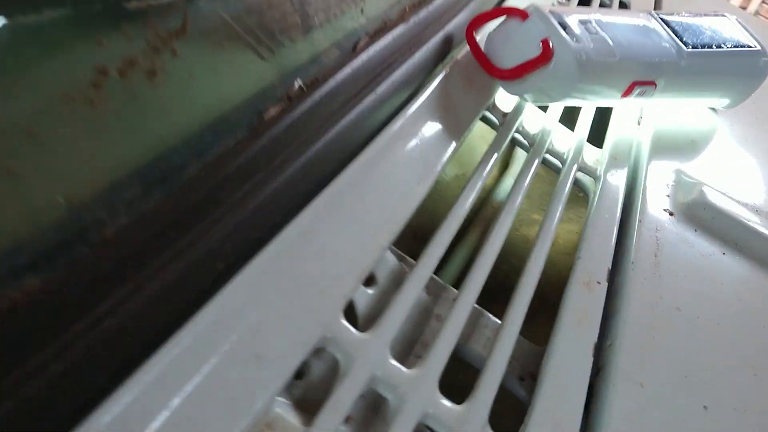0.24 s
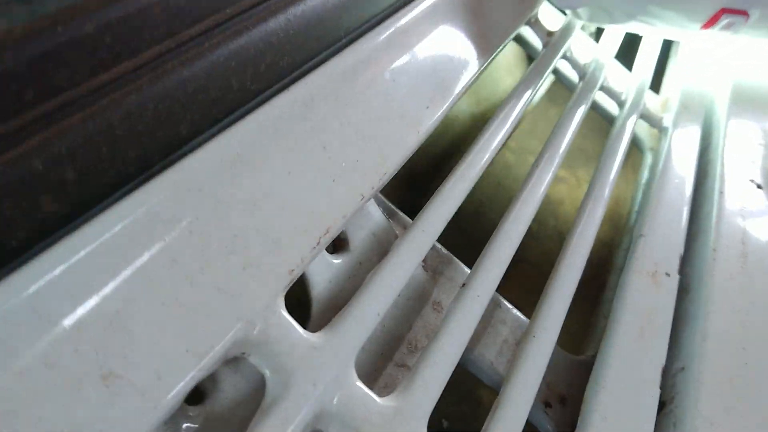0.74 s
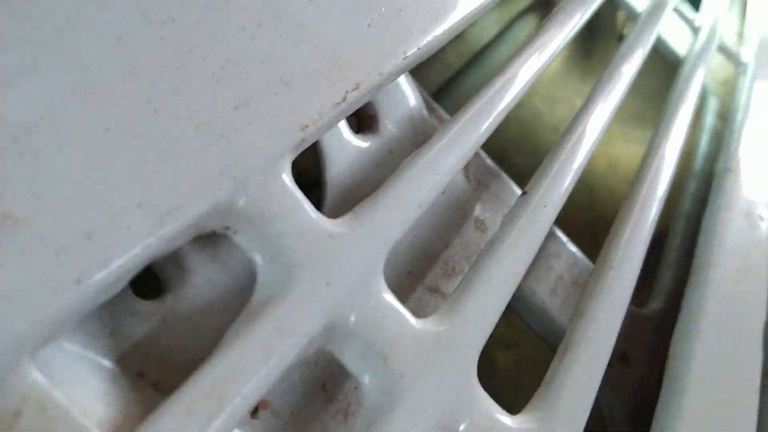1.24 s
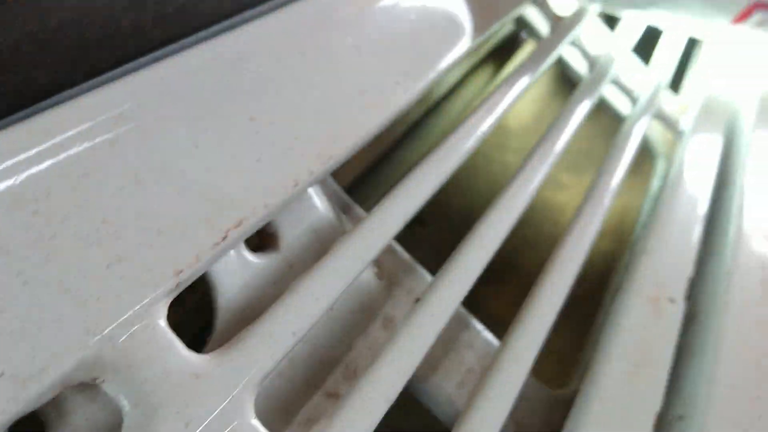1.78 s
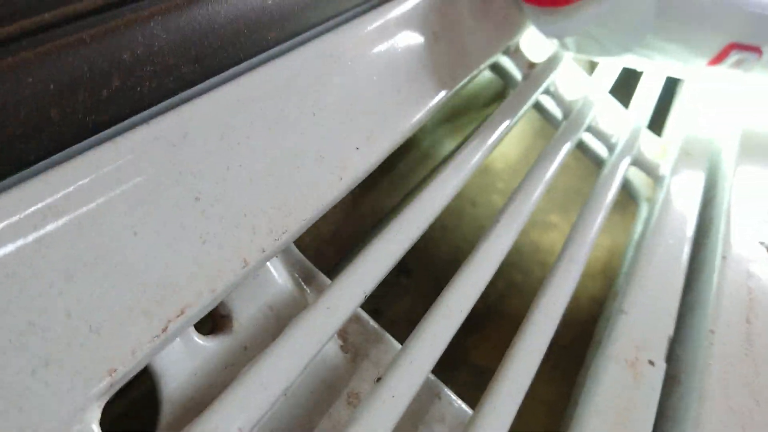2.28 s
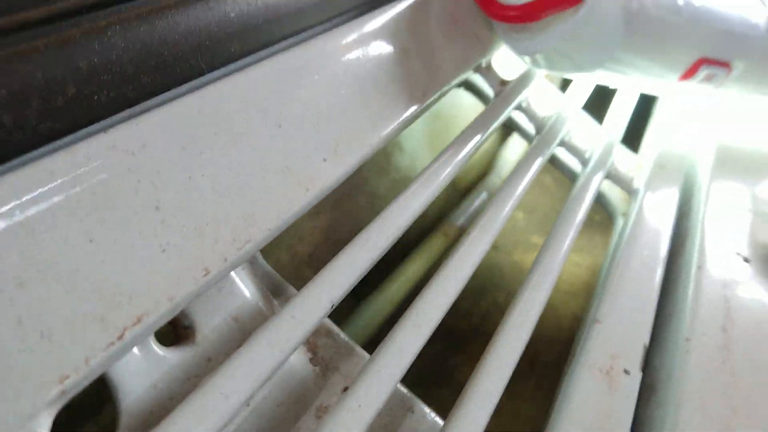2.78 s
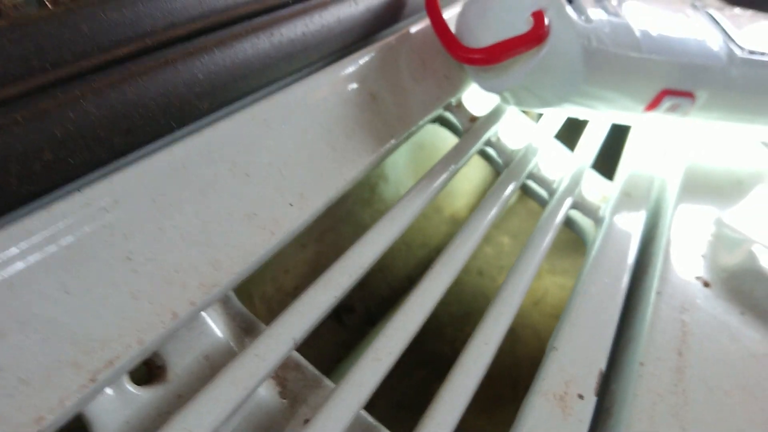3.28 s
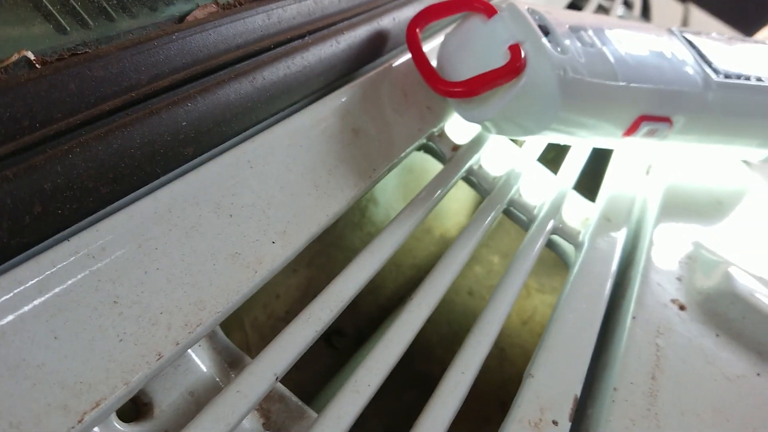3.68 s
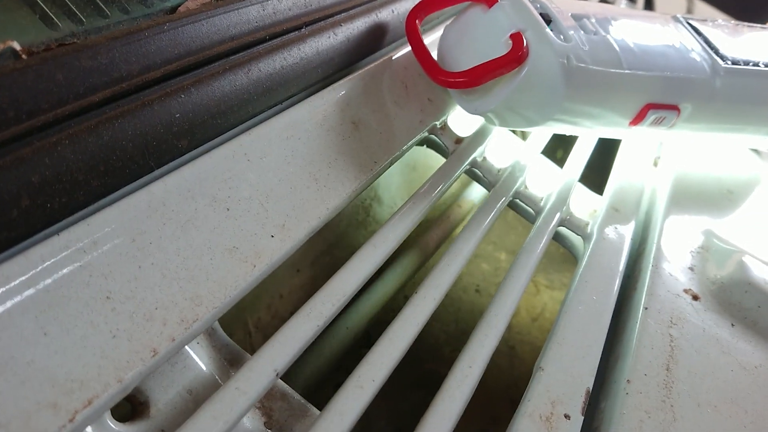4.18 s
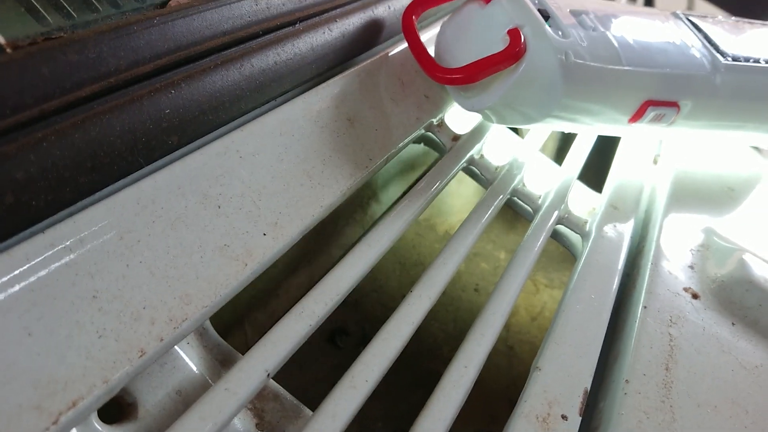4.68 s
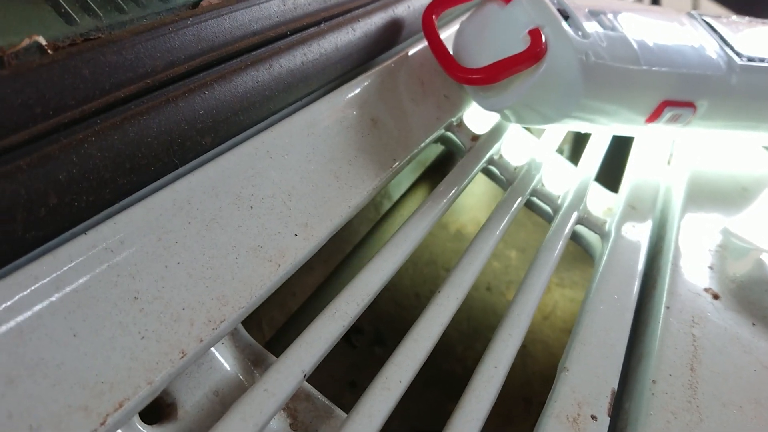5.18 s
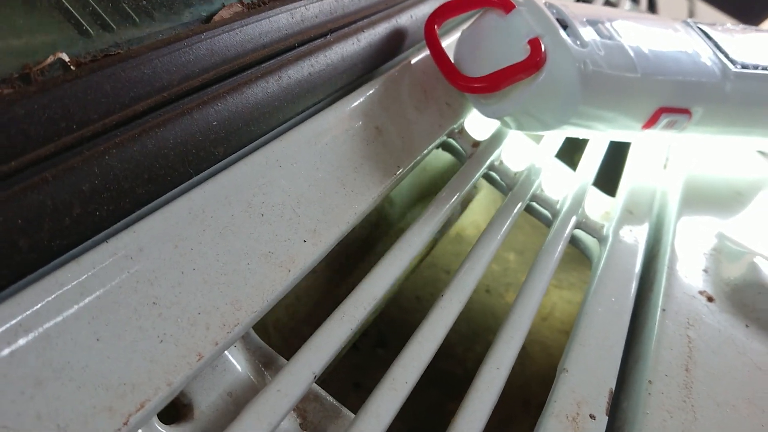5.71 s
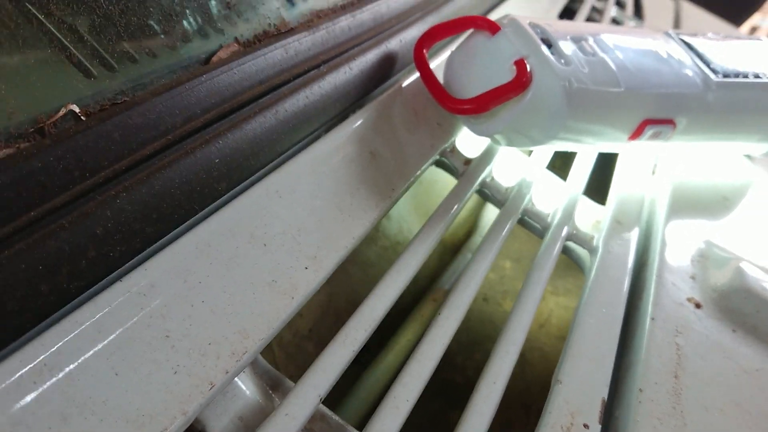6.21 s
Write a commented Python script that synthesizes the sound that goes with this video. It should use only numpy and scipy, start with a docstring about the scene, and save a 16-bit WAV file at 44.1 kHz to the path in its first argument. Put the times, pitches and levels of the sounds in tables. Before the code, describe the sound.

Piercing, near-pure squeals chirp and hold at two high pitches as a wiper linkage works under a truck cowl, with soft knocks and brief groans over motor hum.

```python
"""First comes a short squeak over a motor's hum: a wiper linkage works to and fro under the cowl of a parked truck.
It is heard from close by, louder on the left, over a background hiss. Dry contacts lock into two near-pure squeals,
about 5 and 8 kHz (sines with overtones). Slack joints knock (ringing cowl modes, rattle and thump); thin whistles
and low moans (gliding sines) and bursts of band noise sound; at the turn a pivot groans (a rough row of harmonics).
The shed rings after the sounds (dying noise), and the gain ducks under loud squeals."""
import sys
import numpy as np
from scipy import signal
from scipy.fft import rfft, irfft
from scipy.io import wavfile
from scipy.ndimage import uniform_filter1d

SR = 44100
rng = np.random.default_rng(int(sys.argv[2]) if len(sys.argv) > 2 else 0)


def output_pcm(signal):
    """Save a mono or channel-first signal as 16-bit PCM at the path in sys.argv[1].

    Samples are clipped to [-1, 1] before scaling.
    """
    pcm = np.clip(np.atleast_2d(signal).T, -1, 1) * 32767
    wavfile.write(sys.argv[1], SR, np.round(pcm).astype(np.int16))


N = 284445      # samples in the scene

# The background, with dips under loud squeals: (time [s], motor rumble level [dB], background hiss level [dB])
BACKGROUND = [(0, -51.5, -59.5), (.79, -50.5, -53), (.95, -54.5, -64.5), (1.3, -47.5, -59.5),
              (1.85, -49.5, -50.5), (2.3, -50, -49), (2.65, -47.5, -52.5), (3.36, -52, -59),
              (4.1, -50, -53.5), (4.38, -50.5, -60), (5.6, -50, -48.5), (5.815, -48, -54),
              (5.89, -57, -71.5), (6.04, -49.5, -67), (6.09, -53, -57.5), (6.2, -56.5, -59),
              (6.45, -50.5, -56)]
# Colour of the motor's rumble: (frequency [Hz], relative level [dB])
RUMBLE_COLOUR = [(25, -25.5), (50, 0.5), (79, -3), (108, 1), (156, -13.5), (204, -5), (243, -13.5),
                 (401, -14), (535, -12.5), (601, -15.5), (757, -20.5), (1130, -27.5), (2500, -32),
                 (3250, -72)]
# Colour of the background hiss: (frequency [Hz], relative level [dB])
HISS_COLOUR = [(880, -50), (1500, -15), (2330, -9.5), (2860, -2.5), (5580, -1), (9940, -1), (11900, -7.5),
               (15600, -1.5)]
# How alike noise is on the left and right: (frequency [Hz], likeness [0 to 1])
LIKENESS = [(60, 1), (300, 0.93), (600, 0.3), (1650, 0.084), (15000, 0.0093)]
# How far noise leans to the left: (frequency [Hz], left over right [dB])
NOISE_LEAN = [(60, 2.5), (250, 11.5), (550, 14.5), (1650, 6.5), (4970, 10), (15000, 4.5)]

# Short lower squeaks: (start [s], rise [s], hold [s], fall [s], pitch [Hz], glide [Hz],
#                       level [dB], octave level [dB], left over right [dB])
LOW_CHIRPS = [(0, 0.00073, 0.008, 0.22, 5490, -21, -22, -24.5, 34.5),
              (.034, 0.0084, 0.024, 0.04, 5464, -34.5, -23, -29.5, 16),
              (.87, 0.015, .004, 0.0075, 4880, 22.5, -32.5, -78, 16.5),
              (2.468, 0.026, 0.0024, 0.0036, 4960, -25.5, -21.5, -27.5, 10),
              (2.486, 0.0039, 0.0018, 0.0077, 5005, 61.5, -14, -37.5, 17),
              (3.103, 0.023, 0.012, 0.015, 5600, 38.5, -26.5, -76, 40),
              (3.708, 0.019, 0.0068, 0.0099, 5435, 9.5, -29.5, -39, 14),
              (3.743, 0.017, 0.0033, 0.02, 5380, -8, -17.5, -31, 16.5),
              (3.783, 0.011, 0.017, 0.049, 5430, -21, -19.5, -27.5, 12.5),
              (4.27, 0.036, 0.0087, 0.035, 4880, -13, -33.5, -72.5, 14.5)]
# Held lower squeals, one list each: (time [s], pitch [Hz], level [dB], octave level [dB], left over right [dB])
LOW_HELD = [
    [(0.325, 5420, -55, -81, 19), (0.349, 5464, -24.5, -58, 26.5), (0.377, 5380, -21.5, -31.5, 24),
     (0.457, 5370, -26, -23.5, 10), (0.555, 5383, -16.5, -31, 23), (0.627, 5416, -10, -37, 34.5),
     (0.649, 5404, -14, -40, 33.5), (0.666, 5400, -37, -51, 34)],
    [(2.197, 5010, -59.5, -69, 3), (2.215, 5040, -31.5, -39.5, 8.5), (2.241, 4970, -22, -30, 10),
     (2.267, 4966, -21, -21.5, 12.5), (2.281, 5010, -37, -41, 1), (2.292, 5045, -32, -39, 11),
     (2.308, 5033, -22, -39.5, 7), (2.318, 4750, -31, -41, 4), (2.343, 4790, -36, -73, -2),
     (2.356, 4815, -55.5, -80, 3)],
    [(3.153, 5680, -30, -75, 44), (3.161, 5560, -12, -47.5, 36), (3.169, 5507, -11.5, -21.5, 39),
     (3.215, 5575, -10.5, -39, 46.5), (3.247, 5514, -16, -24, 26), (3.265, 5578, -11, -35, 32.5),
     (3.301, 5524, -13, -26.5, 33), (3.327, 5473, -19, -39.5, 30), (3.363, 5490, -16, -28, 34),
     (3.403, 5600, -24.5, -44, 33), (3.419, 5442, -16, -30, 30), (3.46, 5500, -38.5, -56, 17.5)],
    [(3.855, 5430, -51, -27, 1), (3.901, 5400, -19.5, -19.5, 10.5), (3.915, 5410, -21.5, -22.5, 14.5),
     (3.985, 5426, -10.5, -19, 19.5), (4.009, 5428, -9.5, -25.5, 27), (4.017, 5482, -13, -32, 17),
     (4.027, 5340, -40.5, -56.5, 16.5)],
    [(5.599, 4900, -73, -73, 12.5), (5.613, 5030, -25.5, -33, 10.5), (5.626, 5063, -39, -38.5, 2),
     (5.644, 4990, -25.5, -25.5, 8), (5.658, 5063, -34.5, -45, 1.5), (5.676, 4974, -25, -31, 13),
     (5.724, 5020, -42.5, -75, 0), (5.734, 4720, -39, -51.5, 0.5), (5.757, 4790, -27.5, -46, 6.5),
     (5.78, 4940, -47, -70.5, 11.5)],
]
# Short upper squeaks: (start [s], rise [s], hold [s], fall [s], pitch [Hz], glide [Hz],
#                       level [dB], left over right [dB])
HIGH_CHIRPS = [(1.131, 0.0098, 0.0018, 0.015, 8160, 121.5, -14, 20.5),
               (1.162, 0.0085, 0.027, 0.011, 8680, -250, -12, 20),
               (1.198, 0.0024, 0.014, 0.017, 8440, -200, -16, 19),
               (1.233, 0.015, 0.002, 0.03, 8630, -120, -14, 22),
               (2.438, 0.0076, 0.0026, 0.012, 7965, -250, -12, 19),
               (2.5, 0.017, 0.0029, 0.012, 8190, -150, -9.5, 17.5),
               (2.527, 0.0031, 0.003, 0.0086, 7880, -100, -13.5, 12.5),
               (2.617, 0.0057, 0.022, 0.042, 8570, -91, -12, 11.5),
               (2.695, 0.0067, 0.012, 0.018, 8193, 25, -20, 19),
               (2.796, 0.0064, 0.0025, 0.0087, 8350, 48.5, -34, 22),
               (4.396, 0.0039, 0.0088, 0.014, 8240, -150, -22.5, 6),
               (4.527, 0.0081, 0.0018, 0.015, 8200, 204.5, -16, 7.5),
               (4.552, 0.013, 0.071, 0.0064, 8725, -41, -16, 18.5),
               (4.586, 0.0089, 0.0087, 0.057, 8645, -40, -15.5, 24.5),
               (5.6, 0.015, 0.011, 0.024, 8275, 73.5, -30, 12),
               (5.806, 0.0081, 0.00084, 0.0024, 8070, -64, -11, 13.5),
               (5.818, 0.0025, 0.0084, 0.0031, 8096, -62, -11.5, 14),
               (5.832, 0.0016, 0.0035, 0.022, 7936, -54, -9, 30.5),
               (5.866, 0.018, 0.0016, 0.0069, 7980, 50, -6.5, 20),
               (5.896, 0.0024, 0.012, 0.0037, 8235, -49, -18, 17.5),
               (5.911, 0.0028, 0.0023, 0.0096, 7826, -150, -12.5, 14),
               (6.004, 0.0084, 0.024, 0.045, 8560, -150, -12, 20),
               (6.098, 0.0049, 0.0067, 0.01, 8044, 21.5, -21, 26),
               (6.168, 0.008, 0.004, 0.025, 8240, -22, -28.5, 23)]
# Held upper squeals, one list each: (time [s], pitch [Hz], level [dB], left over right [dB])
HIGH_HELD = [
    [(.662, 8420, -59, 12.5), (.685, 8440, -19.5, 12), (.715, 8470, -12.5, 10.5), (.736, 8380, -18, 16.5),
     (.747, 8430, -4.5, 17.5), (.767, 8560, -9.5, 39.5), (.8, 8520, -6.5, 20), (.834, 8470, -9, 12),
     (.886, 8500, -8.5, 25), (.909, 8260, -19.5, 7), (.945, 8335, -11.5, 9), (.992, 8330, -9.5, -0.5),
     (1.009, 8350, -17.5, 6), (1.021, 7770, -40, -5.5)],
    [(4.03, 8480, -39, 29), (4.041, 8480, -11.5, 27.5), (4.055, 8470, -7.5, 26.5), (4.062, 8550, -12, 20.5),
     (4.068, 8560, -7.5, 14), (4.111, 8560, -6.5, 12.5), (4.242, 8530, -12.5, -2.5), (4.31, 8490, -12, 11),
     (4.331, 8480, -19.5, 1), (4.344, 8410, -13.5, 6.5), (4.38, 8590, -16.5, 13), (4.393, 8190, -15.5, 14)],
]
# How faint a short squeak begins and ends, against its held level [dB]
LOW_START_DB, LOW_END_DB = -22, -10.5
HIGH_START_DB, HIGH_END_DB = -14, -12.5

# The shed's ringing: first return, time to die by 60 dB, loudness, and where its treble dulls
SHED_ONSET_S = 0.0075
TREBLE_T60_S, TREBLE_SHED_DB, TREBLE_DULL_HZ = 0.43, -23, 6430
BASS_T60_S, BASS_SHED_DB, BASS_DULL_HZ = 0.53, -20.5, 870

# Knocks of slack joints: (time [s], blow level [dB], thump level [dB], pitch favoured by the struck spot [Hz])
KNOCKS = [(0.433, -38, -63.5, 434), (1.081, -34, -54.5, 402), (1.134, -32, -33, 350),
          (2.256, -40.5, -40, 255.7), (2.295, -42, -44.5, 255), (2.432, -40.5, -43, 533),
          (2.645, -38.5, -35, 547), (2.688, -40.5, -44, 618), (3.817, -36, -59, 430),
          (4.475, -34, -58, 380), (4.528, -33, -30.5, 381), (5.818, -41, -40.5, 404),
          (6.045, -40, -42, 516), (6.094, -43.5, -50, 448)]
# Ringing modes of the cowl: (frequency [Hz], time to die by 60 dB [s])
COWL_MODES = [(255, .14), (352, .15), (422, .1), (535, .16), (800, .1), (1180, .06)]
SPOT_DB_PER_OCTAVE = 15      # modes far from the favoured pitch are struck more weakly
THUMP_BAND_HZ, THUMP_T60_S = (75.4, 170), 0.18

# Short extra tones, thin whistles beside the squeals and low moans beside the groans:
# (start [s], end [s], pitch [Hz], size of pitch arch [Hz], level [dB])
SHORT_TONES = [(.995, 1.028, 4150, -60, -52), (1.12, 1.165, 8480, 100, -26), (1.178, 1.21, 4430, -60, -48),
               (1.25, 1.305, 405, -30, -44), (1.305, 1.37, 505, 20, -36), (2.31, 2.365, 5000, -40, -37),
               (2.308, 2.36, 4530, -40, -46), (2.525, 2.56, 8220, -50, -21), (3.752, 3.89, 2850, 120, -50),
               (3.76, 3.86, 8300, 150, -56), (4.378, 4.43, 4120, -60, -53), (4.515, 4.555, 8480, 150, -28),
               (4.565, 4.605, 4500, -150, -51), (4.638, 4.7, 425, 20, -42), (4.7, 4.765, 510, 20, -39),
               (5.33, 5.47, 2850, 110, -52), (5.72, 5.795, 5010, 0, -39), (5.725, 5.775, 4540, 30, -45)]
# Bursts of band noise, being scrapes, ticks, groan roughness and a low rumble:
# (start [s], end [s], middle of the band [Hz], level [dB])
NOISE_BURSTS = [(1.4, 1.9, 4200, -56.5), (2.42, 2.58, 4500, -49.5), (4.46, 4.68, 4200, -55),
                (1.03, 1.2, 670, -52), (1.12, 1.17, 2330, -59), (1.3, 1.35, 1660, -53),
                (4.695, 4.735, 1600, -49.5), (4.43, 4.6, 700, -54.5), (4.5, 4.8, 111, -49),
                (3.158, 3.178, 1880, -55.5), (3.158, 3.176, 3800, -49.5), (2.505, 2.522, 1210, -59.5)]

# Pivot groans at the turn: (start [s], rise [s], hold [s], fall [s], pitch [Hz], glide [Hz],
#                            level [dB], octave level [dB])
GROANS = [(1.197, 0.017, 0.027, 0.012, 869, -45.5, -46, -66),
          (1.247, 0.019, 0.0069, 0.07, 755, 31.5, -29.5, -42),
          (4.59, 0.015, 0.02, 0.0032, 792, -30.5, -40, -45),
          (4.627, 0.0035, 0.054, 0.04, 759.7, -35, -32, -43)]
# Third to fifth multiples of the groan's pitch: (level over the octave [dB])
GROAN_UPPER_DB = (-11.5, -22.5, -19)
GROAN_START_DB, GROAN_END_DB = -12.5, (-9, -6.5)      # the end pair is for (tone, octave)

CUTOFF_HZ = 15850      # top of the recorded treble


def from_db(db):
    """Turn decibels into a plain multiplier."""
    return 10 ** (np.asarray(db) / 20)


def rms_one(x):
    """Scale a signal to an rms of 1."""
    return x / np.sqrt(np.mean(x ** 2) + 1e-20)


def in_time(rows):
    """Columns of a table that starts with time, drawn as lines sample by sample."""
    s, *columns = np.transpose(rows)
    return [np.interp(np.arange(N) / SR, s, column) for column in columns]


def at_hz(points, hz):
    """Read a curve over frequency, on a logarithmic pitch scale."""
    known_hz, values = np.array(points).T
    return np.interp(np.log(hz), np.log(known_hz), values)


def drift(rate):
    """Slow chance: noise low-passed twice at the rate in Hz, with an rms of 1."""
    r = np.exp(-2 * np.pi * rate / SR)
    noise = rng.standard_normal(N + SR)
    settled = signal.lfilter([1], [1, -2 * r, r * r], noise)[SR:]
    return rms_one(settled)


def gate(spans):
    """1 inside the spans, 0 outside, with rounded edges of a few ms."""
    on = np.zeros(N)
    for start, end in spans:
        on[max(round(start * SR), 0):round(end * SR)] = 1
    return uniform_filter1d(uniform_filter1d(on, size=100), size=100)


def coloured(spectrum):
    """Stereo noise of a given colour, likeness and lean; the mean of both sides has an rms of 1."""
    hz = np.maximum(np.fft.rfftfreq(N, 1 / SR), 5)
    shape = from_db(at_hz(spectrum, hz))
    mid, side = rfft(rng.standard_normal((2, N)))
    alike = np.clip(at_hz(LIKENESS, hz), 0, 1)
    lean = from_db(at_hz(NOISE_LEAN, hz) / 2)      # half is given to each side
    mid, side = np.sqrt(1 + alike) * mid, np.sqrt(1 - alike) * side
    out = irfft(shape * np.array([(mid + side) * lean, (mid - side) / lean]), N)
    return out / np.sqrt(np.mean(out.mean(0) ** 2))


def motor_hum():
    """The motor's low rumble: coloured noise whose level rises, dips and flickers."""
    level_db, _ = in_time(BACKGROUND)
    return from_db(level_db + 1.6 * drift(10)) * coloured(RUMBLE_COLOUR)


def background_hiss():
    """Bright coloured noise whose level rises and falls, dips under loud squeals and flickers."""
    _, level_db = in_time(BACKGROUND)
    return from_db(level_db + 0.7 * drift(15)) * coloured(HISS_COLOUR)


def chirps(rows, start_db, end_db, count):
    """Each slip swells, holds and fades while its pitch glides evenly; the next one squeezes it if too near."""
    tables = []
    next_starts = [row[0] for row in rows[1:]] + [N / SR]
    for (start, rise, hold, fall, hz, glide_hz, *rest), next_start in zip(rows, next_starts):
        steps = np.cumsum([0, abs(rise), abs(hold), abs(fall)])
        squeeze = min(1, (next_start - start - 1 / SR) / steps[-1])
        table = []
        for t, db in zip(steps, (start_db, 0, 0, end_db)):
            pitch_hz = hz + glide_hz * (t / steps[-1] - 0.5)
            levels_db = np.add(rest[:count], db)      # the first columns are levels
            table.append((start + squeeze * t, pitch_hz, *levels_db, *rest[count:]))
        tables.append(table)
    return tables


def bursts(tables, wobble_hz, levels):
    """Phase, gate and other columns of a self-driven tone; its levels swell along rounded curves."""
    rows = np.array(sorted(tuple(row) for table in tables for row in table), float)
    rows[:, 2:2 + levels] = np.sqrt(from_db(rows[:, 2:2 + levels]))
    hz, *rest = [uniform_filter1d(c, size=130) for c in in_time(rows)]      # inertia rounds the corners
    rest[:levels] = 2 * 20 * np.log10(rest[:levels])      # back to dB, undoing the square root
    phase = 2 * np.pi * np.cumsum(hz + wobble_hz * drift(60)) / SR
    on = gate([(table[0][0], table[-1][0]) for table in tables])
    return phase, on, rest


def tone(phase, level_db, lean_db, lag):
    """A sine on both sides, the right one scaled down by the lean and lagging; level is the rms of their mean."""
    right = from_db(-lean_db)
    left = 2 * np.sqrt(2 / (1 + right ** 2 + 2 * right * np.cos(lag))) * from_db(level_db)
    return left * np.array([np.sin(phase), right * np.sin(phase - lag)])


def squeals():
    """Two stick-slip tones with overtones; where they sound together the contact mixes them."""
    low_slips = list(LOW_HELD) + chirps(LOW_CHIRPS, LOW_START_DB, LOW_END_DB, count=2)
    high_slips = list(HIGH_HELD) + chirps(HIGH_CHIRPS, HIGH_START_DB, HIGH_END_DB, count=1)
    low, low_on, (low_db, octave_db, low_lean) = bursts(low_slips, wobble_hz=3.5, levels=2)
    high, high_on, (high_db, high_lean) = bursts(high_slips, wobble_hz=8, levels=1)
    grip_db = 1.11 * drift(40)      # uneven grip makes the level flutter

    lower = tone(low, low_db + grip_db, low_lean, lag=2.1)
    lower += tone(2 * low, octave_db + grip_db, 13, lag=1.5)
    lower += tone(3 * low, 1.3 * octave_db - 0.5, 8, lag=1.4)
    upper = tone(high, high_db + grip_db, high_lean, lag=1.0)
    upper += tone(2 * high, high_db - 34, 8, lag=1.4)

    # mixing is strongest when the upper squeal dominates
    both = low_on * high_on * np.clip((high_db - low_db - 10.5) / 10, 0, 1)
    mixed = tone(low + high, low_db - 0.5, 8, lag=1.5)
    mixed += tone(2 * high - low, low_db - 11, 8, lag=1.4)
    mixed += tone(high - low, low_db + high_db - 11, 8, lag=1.4)
    return low_on * lower + high_on * upper + both * mixed


def shed(x, t60, db, dull_hz, order, alike):
    """Reverberation as dying noise, partly alike on both sides and louder on the left."""
    t = np.arange(SR) / SR
    tail = rng.standard_normal((2, SR)) * from_db(-60 * t / t60) * (t > SHED_ONSET_S)
    tail[1] = alike * tail[0] + np.sqrt(1 - min(alike, 1) ** 2) * tail[1]
    dull = signal.butter(order, dull_hz, fs=SR, output="sos")      # walls and air eat treble
    tail = signal.sosfilt(dull, tail)
    tail /= np.sqrt(np.sum(tail ** 2, axis=1, keepdims=True))
    ringing = signal.fftconvolve(x[None], tail, axes=1)[:, :N]
    return from_db(db) * ringing * from_db([[2.5], [-2.5]])


def knocks():
    """A soft contact chatters briefly; it rings the cowl's modes, leaves a short rattle and thumps the body."""
    out, t = np.zeros(N + SR), np.arange(SR // 4) / SR
    dull = signal.butter(3, 1100, fs=SR, output="sos")
    body = signal.butter(2, THUMP_BAND_HZ, "band", fs=SR, output="sos")
    for start, blow_db, thump_db, spot_hz in KNOCKS:
        rings = np.zeros(len(t))
        for hz, t60 in COWL_MODES:
            struck_db = -SPOT_DB_PER_OCTAVE * abs(np.log2(hz / spot_hz))
            rings += from_db(struck_db - 60 * t / t60) * np.sin(2 * np.pi * hz * t)

        touches = rng.random(len(t)) < 300 / SR      # about 300 random touches per second, dying away
        chatter = rng.standard_normal(len(t)) * touches * from_db(-60 * t / 0.1)
        chatter[0] = 1      # the first contact
        rings = signal.fftconvolve(rings, chatter)[:len(t)]

        rattle = rng.standard_normal(len(t)) * from_db(-60 * t / 0.065) * np.minimum(t / 0.0069, 1)
        rattle = signal.sosfilt(dull, rattle)
        thump = rms_one(signal.sosfilt(body, rng.standard_normal(len(t))))
        thump *= from_db(-60 * t / THUMP_T60_S)

        blow = 0.96 * rings / abs(rings).max() + 0.36 * rattle / abs(rattle).max()
        at = round(start * SR)
        out[at:at + len(t)] += from_db(blow_db) * blow + from_db(thump_db) * thump
    return out[:N] * from_db([[3], [-5]])      # louder on the left


def short_tones():
    """Thin whistles and low moans: sines that swell and fade; the pitch arches, unsteady in pitch and level."""
    waver, flutter_db = 0.5 * drift(30), 3 * drift(70)      # waver shifts the phase, in radians
    out = np.zeros((2, N))
    for start, end, hz, arch_hz, db in SHORT_TONES:
        at = slice(round(start * SR), round(end * SR))
        u = np.linspace(0, 1, at.stop - at.start)
        pitch_hz = hz + arch_hz * (np.sin(2 * u ** 0.64) - 0.8)
        phase = 2 * np.pi * np.cumsum(pitch_hz) / SR + waver[at]
        swell = np.sin(np.pi * u ** 0.52) ** 2
        out[:, at] += swell * tone(phase, db + flutter_db[at], 11, lag=1.1)
    return out


def noise_bursts():
    """Scrapes, ticks, groan roughness and a low rumble: grainy, lumpy band noise that fades slower than it swells."""
    out, lumps = np.zeros((2, N)), from_db(3.3 * drift(60))
    for start, end, hz, db in NOISE_BURSTS:
        at = slice(round(start * SR), round(end * SR))
        u = np.linspace(0, 1, at.stop - at.start)
        grains = rng.standard_normal((2, len(u))) * from_db(1.8 * rng.standard_normal(len(u)))
        grains[1] += at_hz(LIKENESS, hz) * (grains[0] - grains[1])      # low ones are more alike on both sides
        band = signal.butter(2, [hz / 1.16, hz * 1.235], "band", fs=SR, output="sos")
        burst = rms_one(signal.sosfilt(band, grains))
        out[:, at] += from_db(db) * np.sin(np.pi * u ** 0.74) * lumps[at] * burst
    return out * from_db([[4.5], [-3.5]])      # louder on the left


def groan():
    """Slow slips of the pivot: a rough tone with harmonics."""
    slips = chirps(GROANS, GROAN_START_DB, GROAN_END_DB, count=2)
    phase, on, (level_db, octave_db) = bursts(slips, wobble_hz=10, levels=2)
    phase = phase + 0.08 * drift(120)      # each slip comes a little early or late
    out = tone(phase, level_db + 2 * drift(74), 8.6, lag=0.71)
    out += tone(2 * phase, octave_db + 3.25 * drift(75), 21, lag=0.66)
    for multiple, db in enumerate(GROAN_UPPER_DB, start=3):
        out += tone(multiple * phase, octave_db + db + 5 * drift(130), 9.2, lag=1.8)
    return on * out


def scene():
    """Add up the tones, knocks and noises, and the shed's ringing, which is fed from the left side."""
    brief = short_tones()
    high, low = squeals() + brief, groan() + knocks()
    echoes = shed(high[0], TREBLE_T60_S, TREBLE_SHED_DB, TREBLE_DULL_HZ, order=1, alike=0)
    echoes += shed((low + brief)[0], BASS_T60_S, BASS_SHED_DB, BASS_DULL_HZ, order=2, alike=0.58)
    return high + low + echoes + motor_hum() + background_hiss() + noise_bursts()


def record(dry):
    """A limiter holds loud squeals down and recovers slowly; deep bass and the top are cut."""
    peak_db = 20 * np.log10(abs(dry).max(0) + 1e-9)
    over_db = np.maximum(peak_db + 2.73, 0)      # how far above -2.73 dB
    ramp = 12 * np.arange(N) / SR      # the held excess sinks by 12 dB per second
    held_db = np.maximum.accumulate(over_db + ramp) - ramp
    out = dry * from_db(-0.6 * uniform_filter1d(held_db, size=200))      # take off 0.6 of the excess
    out = signal.sosfilt(signal.butter(4, 40, "high", fs=SR, output="sos"), out)
    return signal.sosfilt(signal.ellip(10, 0.5, 70, CUTOFF_HZ, fs=SR, output="sos"), out)


dry = scene()
out = record(dry)
output_pcm(out)
```